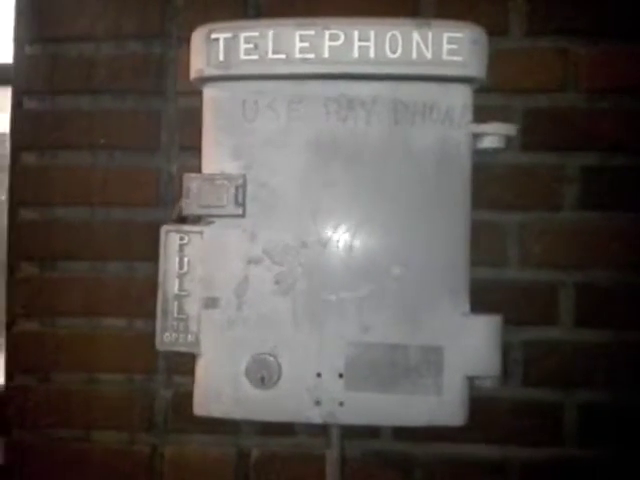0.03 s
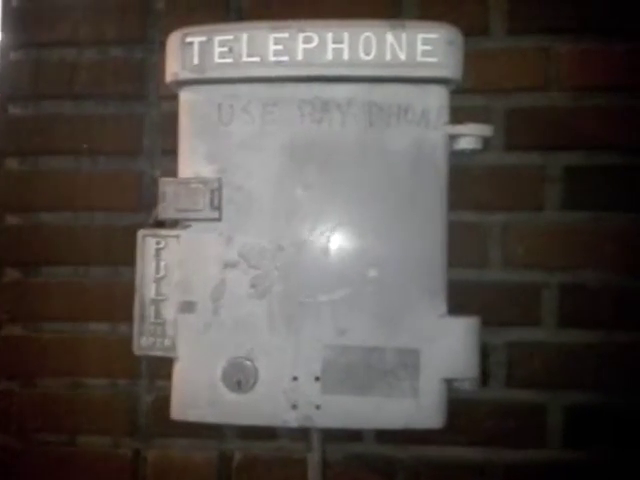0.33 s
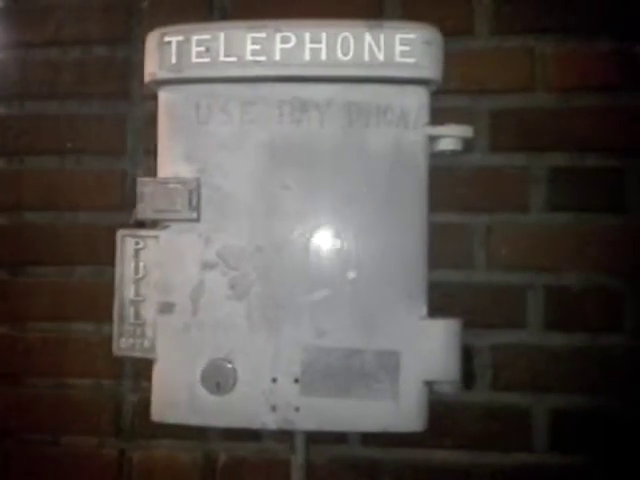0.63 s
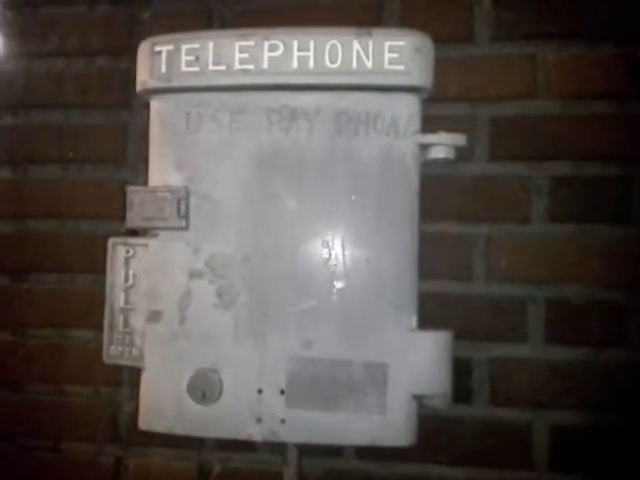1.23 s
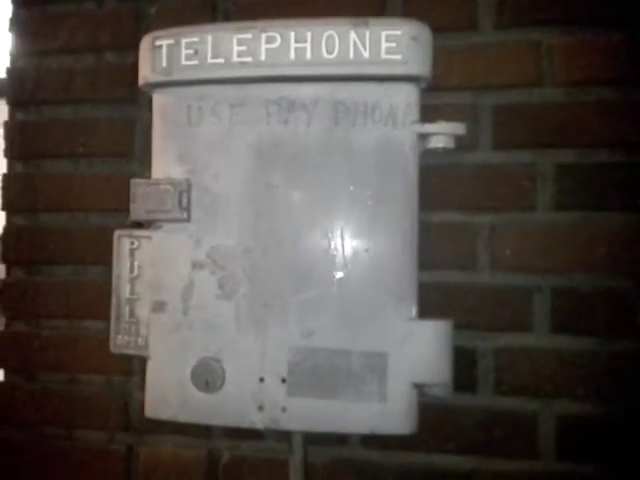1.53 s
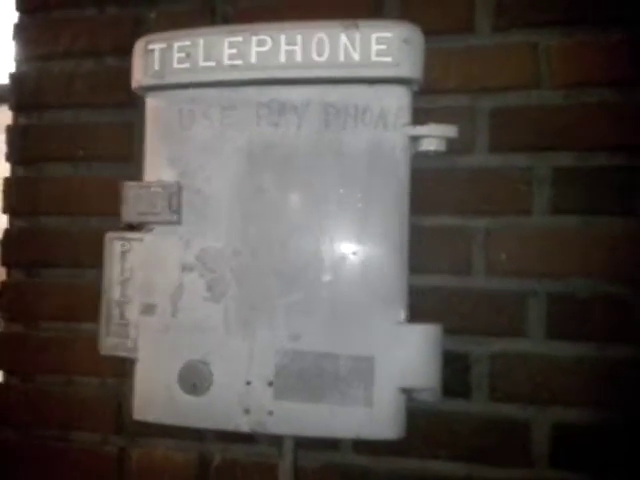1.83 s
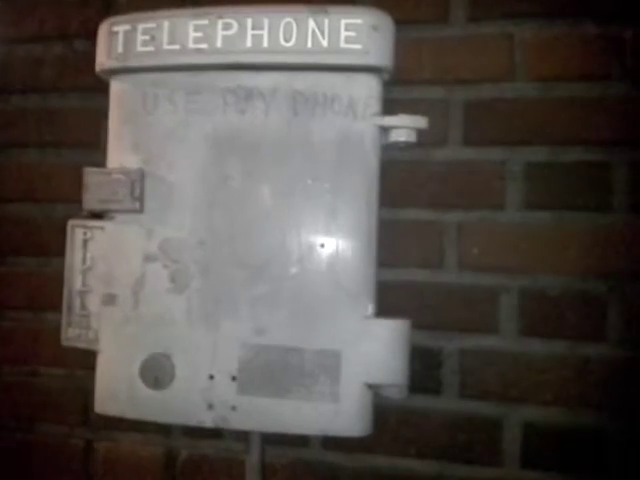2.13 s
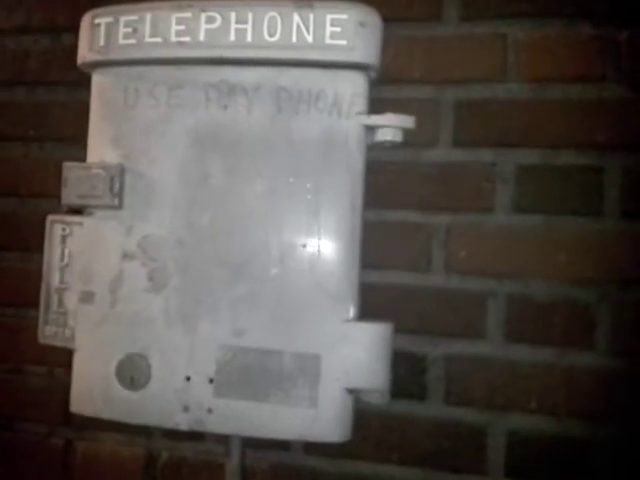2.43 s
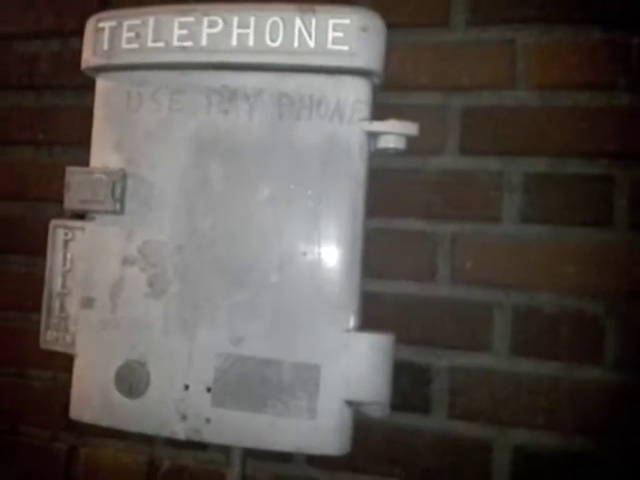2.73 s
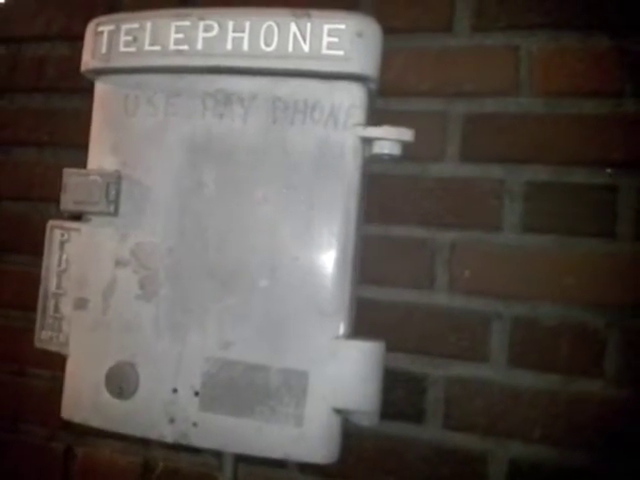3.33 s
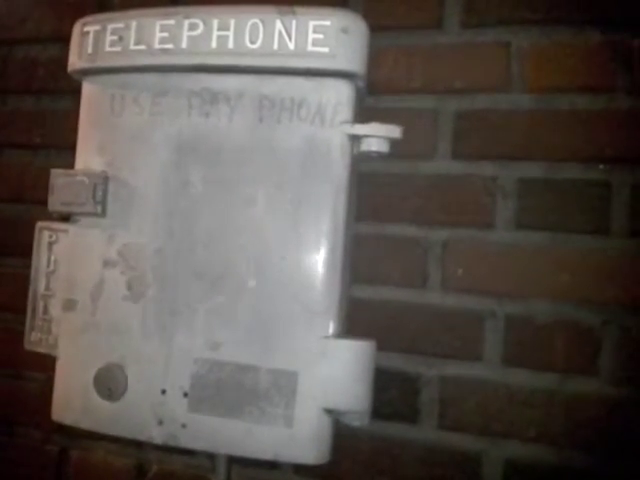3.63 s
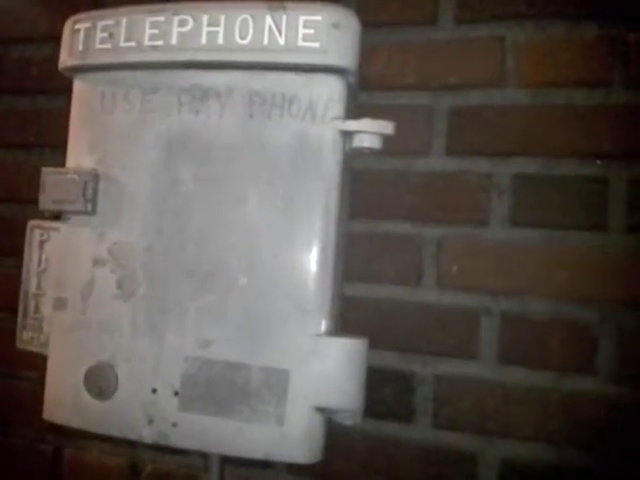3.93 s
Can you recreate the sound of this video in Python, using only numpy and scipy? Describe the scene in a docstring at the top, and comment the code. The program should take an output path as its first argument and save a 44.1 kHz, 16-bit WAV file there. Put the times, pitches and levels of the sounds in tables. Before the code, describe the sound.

Fingers knock and rub on a camera's plastic case over a faint hum and hiss.

```python
"""A quiet spot by a brick wall, heard from a hand-held camera. Mains electricity hums, distant air makes
a low wash, and the camera adds its own faint whirr and hiss. Close to the microphone, fingers knock
on the plastic case: each touch gives a bright tick, a tiny scuff and a dull thump as the case rings
briefly. Now and then a finger slides across the plastic with a soft, grainy rub."""
import sys
import numpy as np
from scipy import signal
from scipy.fft import rfft, irfft
from scipy.io import wavfile

SR = 44100
rng = np.random.default_rng(int(sys.argv[2]) if len(sys.argv) > 2 else 0)


def store_wav(level_fs):
    """Save 16-bit WAV to argv[1]."""
    pcm = np.round(np.clip(np.atleast_2d(level_fs), -1, 1) * 32767)
    wavfile.write(sys.argv[1], SR, pcm.T.astype(np.int16))


N = 176400  # 4 seconds


def undb(db):
    """Turn decibels into a number to multiply by."""
    return 10 ** (np.asarray(db) / 20)


def unit(x):
    """Scale a signal so that its average strength (rms) is 1."""
    return x / np.sqrt(np.mean(x ** 2))


def wander(rate_hz):
    """A curve of strength 1 that glides to a new random value rate_hz times a second."""
    targets = rng.standard_normal(4096)
    return unit(np.interp(np.arange(N) / SR * rate_hz, np.arange(len(targets)), targets))


def noise(points, tilt_db=0):
    """Noise shaped by (Hz, dB) points, made brighter by tilt_db per octave."""
    hz, db = np.array(points, float).T
    octave = np.log2(np.maximum(np.fft.rfftfreq(N, 1 / SR), 1))
    gain = undb(np.interp(octave, np.log2(hz), db + tilt_db * np.log2(hz)))
    return unit(irfft(rfft(rng.standard_normal(N)) * gain, N))


def keep_side(x, hz, side, order=2):
    """Keep the "low" or "high" side of hz; a higher order cuts more sharply."""
    return signal.sosfilt(signal.butter(order, hz, side, fs=SR, output="sos"), x)


def add(out, start_s, x):
    """Mix a short sound in at its start time."""
    i = max(int(start_s * SR), 0)
    out[i:i + len(x)] += x[:max(N - i, 0)]


def fade(t, seconds):
    """A level that falls by 60 dB in the given time."""
    return np.exp(-np.log(1000) * t / seconds)


def ring(tones, t):
    """A struck object rings with several tones, each dying away at its own speed."""
    return sum(undb(db) * np.cos(2 * np.pi * hz * t) * fade(t, fade_s) for hz, fade_s, db in tones)


def mains_hum():
    """Mains electricity hums at multiples of 120 Hz, each tone wavering a little."""
    # Each row: pitch in Hz, average level in dB.
    tones = [(120, -65), (240, -56.5), (360, -72.5), (480, -66), (600, -71.5), (720, -72), (960, -74),
             (1200, -77.5)]
    out, t = np.zeros(N), np.arange(N) / SR
    for hz, db in tones:
        level = undb(db + 1.16 * wander(rate_hz=4.14))
        out += level * np.sqrt(2) * np.sin(2 * np.pi * (hz * t + rng.random()))
    return out


def distant_air():
    """Faraway air makes a low wash that swells gently."""
    # The tone colour of the wash. Each row: frequency in Hz, relative level in dB.
    colour = [(20, 1), (40, -48), (58, 1.5), (85, -1.5), (125, 2), (200, 4.5), (300, -0.5), (450, -0.5),
              (620, -3), (850, -3), (1100, -6), (1500, -7), (2200, -14.5), (3200, -20), (5000, -26),
              (8000, -93), (15000, -29)]
    level_db, swell_db = -55, 0.5
    return noise(colour) * undb(level_db + swell_db * wander(rate_hz=2.44))


def camera_whirr_and_hiss():
    """The camera whirrs in narrow bands of noise over the even hiss of its microphone amplifier."""
    # The bands of the whirr. Each row: centre in Hz, width in Hz, base level in dB.
    bands = [(4227, 410, -74), (4780, 310, -82), (2800, 700, -93.5), (1380, 40, -82.5), (3540, 150, -88)]
    # The whirr's slow rise and fall. Each row: time in seconds, change of level in dB.
    drift = [(0, 2.5), (.2, 0), (.45, -1), (1.1, 1.7), (1.6, -1.5), (2.25, 0), (2.7, 0), (3.5, -1.5),
             (3.85, 4), (4, -1)]
    hiss_db, waver_db = -66.5, 2.7
    freqs = np.fft.rfftfreq(N, 1 / SR)
    drift_db = np.interp(np.arange(N) / SR, *np.array(drift, float).T)
    out = undb(hiss_db) * rng.standard_normal(N)
    for hz, width, db in bands:
        peak = 1 / (1 + (2 * (freqs - hz) / width) ** 2)
        band = unit(irfft(rfft(rng.standard_normal(N)) * peak, N))
        out += band * undb(db + drift_db + waver_db * wander(rate_hz=9))
    return out


def finger_knocks():
    """A finger ticks, slips a little and thumps the case; its softness and place set the thump's range."""
    # Each row: start in seconds, thump's peak level in dB, its low and high edges in Hz, tick level in dB.
    knocks = [(0.0687, -41, 200, 1500, -58), (.0745, -41, 100, 198, -79), (1.745, -34.5, 160, 850, -60),
              (1.7681, -23.5, 130, 696, -52), (2.3038, -43, 450, 1700, -65), (2.927, -32.5, 140, 620, -68),
              (2.9316, -17, 184, 940, -28.5), (3.5390, -34.5, 336, 1460, -56),
              (3.6740, -27, 170, 1100, -50.5), (3.7151, -18, 170, 990, -30.5), (3.8823, -37, 115, 476, -63)]
    # The case's dull tones. Each row: pitch in Hz, seconds to fade by 60 dB, relative level in dB.
    case_tones = [(259, 0.019, 1.5), (350, .016, 0.5), (476, 0.017, -5.5), (710, 0.022, -12.5),
                  (850, 0.037, -17.5), (1360, .013, 0)]
    # The short, bright tones of the first touch, with the same columns.
    tick_tones = [(1520, 0.0076, -14), (1860, 0.0052, 5.5), (2460, 0.0072, 6.5), (3920, 0.0062, 6.5),
                  (4150, 0.0069, 0), (5620, 0.0024, -19), (7340, 0.005, -24)]
    tick_rise_s, tick_lead_s, tick_top_hz = 0.00061, 0.00033, 7100
    scuff_db, scuff_fade_s, scuff_low_hz, scuff_high_hz = -7, 0.017, 1870, 4870
    out, t = np.zeros(N), np.arange(SR // 10) / SR
    body = ring(case_tones, t)
    tick = ring(tick_tones, t) * (1 - np.exp(-t / tick_rise_s))
    tick /= np.abs(tick).max()
    slip = undb(scuff_db) * fade(t, scuff_fade_s)  # relative to the tick
    for start, thump_db, low_hz, high_hz, tick_db in knocks:
        thump = keep_side(body, low_hz, "high", order=3)
        thump = keep_side(thump, high_hz, "low", order=3)
        add(out, start, undb(thump_db) * thump / np.abs(thump).max())
        friction = keep_side(rng.standard_normal(len(t)), scuff_low_hz, "high")
        scuff = slip * unit(keep_side(friction, scuff_high_hz, "low"))
        touch = keep_side(tick + scuff, tick_top_hz, "low", order=8)
        add(out, start - tick_lead_s, undb(tick_db) * touch)
    return out


def finger_rubs():
    """Skin slides on plastic, making short swells of grainy friction noise."""
    # Each row: start, rise, hold and fall in seconds, level in dB, added brightness in dB per octave.
    rubs = [(0.532, 0.077, 0.031, 0.042, -51, -0.5), (0.643, 0.019, 0.025, 0.061, -52, 0),
            (0.995, 0.049, 0.039, 0.16, -63, -1.5), (1.444, 0.0037, .006, .012, -53, 1),
            (1.455, 0.011, .012, 0.18, -57, -0.5), (1.493, .003, .006, 0.016, -59, 2),
            (3.68, 0.018, 0.25, 0.093, -59.5, -1)]
    # The tone colour of the friction. Each row: frequency in Hz, relative level in dB.
    colour = [(40, -43), (130, -15), (400, 7), (800, -0.5), (1600, -4), (2800, -12), (4500, -12),
              (7000, -16.5), (9000, -20), (14000, -24.5)]
    grain_db, grain_hz, top_hz = 1.6, 220, 12700
    out, t = np.zeros(N), np.arange(N) / SR
    for start, rise, hold, fall, db, tilt_db in rubs:
        pressure = np.interp(t, start + np.cumsum([0, rise, hold, fall]), [0, 1, 1, 0])
        friction = noise(colour, tilt_db) * undb(grain_db * wander(grain_hz))
        out += undb(db) * pressure * unit(friction)
    return keep_side(out, top_hz, "low")


def scene():
    """Finger noises over the steady background, in one channel."""
    fingers = finger_knocks() + finger_rubs()
    return (fingers + mains_hum() + distant_air() + camera_whirr_and_hiss())[None]


def record(dry):
    """The camera sharply cuts off the highest treble."""
    top_hz = 14550
    return signal.sosfilt(signal.ellip(12, .1, 70, top_hz, fs=SR, output="sos"), dry)


dry = scene()
out = record(dry)
store_wav(out)
```